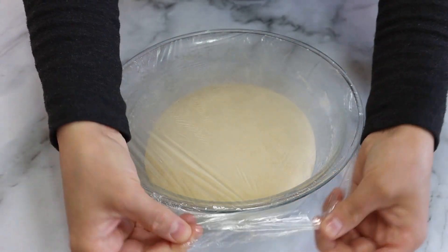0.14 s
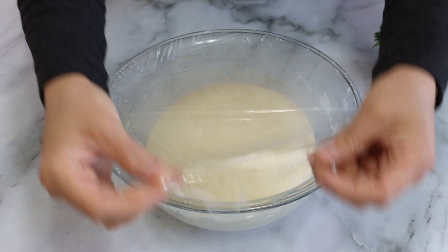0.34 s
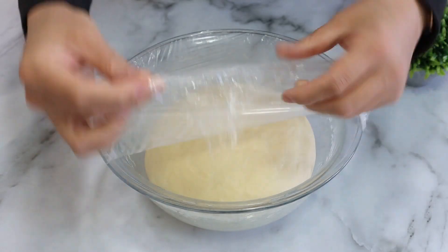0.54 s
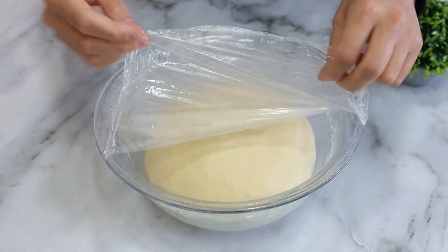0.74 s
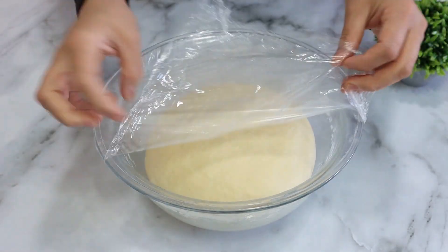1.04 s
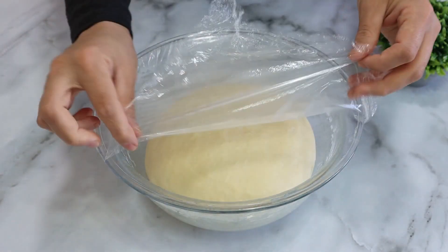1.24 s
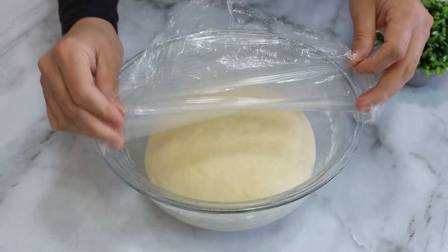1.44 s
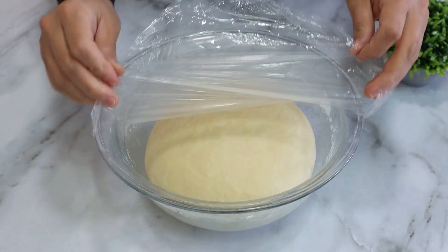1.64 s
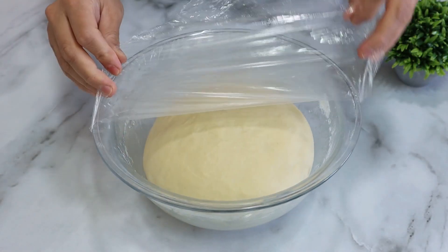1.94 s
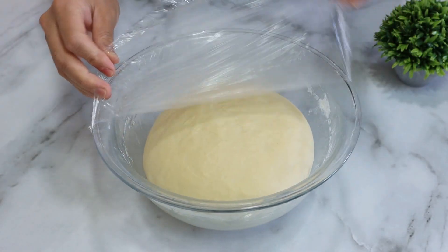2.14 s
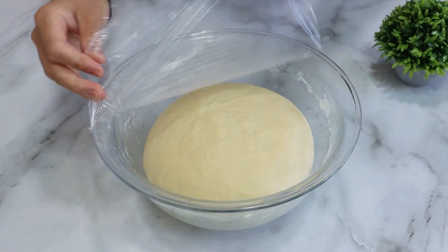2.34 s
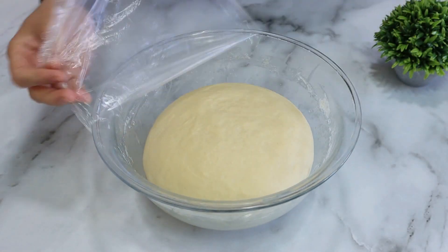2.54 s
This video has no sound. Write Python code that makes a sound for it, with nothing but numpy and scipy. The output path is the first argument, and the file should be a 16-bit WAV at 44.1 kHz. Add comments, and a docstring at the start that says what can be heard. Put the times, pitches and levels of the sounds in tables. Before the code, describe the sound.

Thin cling film is peeled off a glass bowl, heard close in a quiet kitchen. After a faint rub, dense crackle and sharp popping snaps build from 0.1 s, strongest at 0.3-0.5 s, with soft rustle and faint bowl ringing. It thins to near silence around 0.9-1.2 s. Brighter, looser crinkles and ticks come at 1.3-1.8 s, then another crackly pull at 2.2-2.5 s, fading to a last small tick near 2.7 s.

```python
"""Peeling cling film off a bowl

Hands peel cling film off a glass bowl on a kitchen counter, heard from close by.
The taut film unsticks in dense crackle and sharp snaps, rests, then crinkles as it is drawn back.
Each snap is a short low-pitched pop plus a bright tick of noise; crackle is shaped from random clicks.
Soft rubs, a hum, bumps, rustle and rumble lie below; the bowl rings faintly and the kitchen answers."""
import sys
import numpy as np
from scipy import signal
from scipy.fft import rfft, irfft
from scipy.io import wavfile
from scipy.ndimage import uniform_filter1d

SR = 44100
rng = np.random.default_rng(int(sys.argv[2]) if len(sys.argv) > 2 else 0)


def generate_wav(signal):
    """Clip the signal to [-1, 1] and save it as 16-bit WAV at the path in sys.argv[1]."""
    frames = np.transpose(np.atleast_2d(signal))
    scaled = np.clip(frames, -1, 1) * 32767
    pcm = np.round(scaled).astype(np.int16)
    wavfile.write(sys.argv[1], SR, pcm)


N = 119070
TIME = np.arange(N) / SR


def amp(db):
    """Turns decibels into a plain multiplier."""
    return 10 ** (np.asarray(db) / 20)


def unit(x):
    """Scales a sound to an average strength (rms) of 1."""
    return x / np.sqrt(np.mean(x ** 2) + 1e-20)


def read(points, hz):
    """Reads a table between its points, on a logarithmic pitch axis."""
    f, value = np.transpose(points)
    return np.interp(np.log(hz + 1), np.log(f + 1), value)


def level(table, axis):
    """Turns one dB column of a table into a multiplier that changes over time."""
    rows = np.array(table)
    return amp(np.interp(TIME, rows[:, 0], rows[:, axis]))


def add(mix, s, sound):
    """Mixes a sound in, starting at time s in seconds."""
    part = mix[max(0, round(s * SR)):][:len(sound)]
    part += sound[:len(part)]


def colour(x, points):
    """Filters a sound to a spectrum shape, without pre-echo; the filter has unit energy."""
    log_gain = np.log(amp(read(points, abs(np.fft.fftfreq(4096, 1 / SR)))))
    # the Hilbert transform supplies the phase that puts the energy as early as possible
    spectrum = np.exp(np.conj(signal.hilbert(log_gain)))
    taps = np.fft.ifft(spectrum).real[:2048]
    return signal.fftconvolve(x, taps / np.linalg.norm(taps))[:N]


# Tone of the steady background noise: (pitch [Hz], relative level [dB])
FLOOR_COLOUR = [(25, -5), (60, 7.5), (200, -5), (500, -11.5), (1600, -2.5), (4000, -19.5), (8000, -13),
                (13000, -15), (16000, -27.5)]
FLOOR_DB = -84.5


def background():
    """Steady, very quiet noise: random samples filtered to one fixed tone."""
    return amp(FLOOR_DB) * colour(rng.standard_normal(N), FLOOR_COLOUR)


# Time the room's tail takes to fall by 60 dB: (pitch [Hz], decay time [s])
ROOM_T60 = [(100, 0.44), (500, 0.18), (1500, 0.46), (4000, 0.63), (9000, 0.6), (15000, 0.4)]
ROOM_DB, NEAR_DB = -14.5, -6  # strength of the tail and of the quick reflections
NEAR_S = 0.008  # the quick reflections shrink to 37 % in this time


def kitchen(x):
    """Quick reflections from bowl and counter, then a room tail that decays by pitch."""
    t = np.arange(SR) / SR
    near, far = rng.standard_normal((2, SR)) * (t > .002)
    near = near * np.exp(-t / NEAR_S)
    hz, when, bands = signal.stft(far, SR, nperseg=256)
    decay = np.exp(-np.log(1000) * when / read(ROOM_T60, hz)[:, None])
    tail = signal.istft(bands * decay, SR, nperseg=256)[1][:SR]
    echo = amp(NEAR_DB) * near / np.linalg.norm(near) + amp(ROOM_DB) * tail / np.linalg.norm(tail)
    return signal.fftconvolve(x, echo)[:N]


# Loudness of the moving arms: (time [s], level [dB])
RUMBLE = [(0, -83.5), (.14, -84), (.2, -61), (.42, -64.5), (.55, -77.5), (.7, -94), (1.12, -97),
          (1.28, -66.5), (1.55, -75.5), (1.65, -68), (2.52, -64.5), (2.7, -71.5)]
# Tone of the moving arms: (pitch [Hz], relative level [dB])
RUMBLE_COLOUR = [(20, -27.5), (52, -0.5), (95, -8), (135, -1), (260, -10), (600, -38)]


def rumble():
    """The arms rumble as they move: low filtered noise that swells and fades."""
    return level(RUMBLE, axis=1) * colour(rng.standard_normal(N), RUMBLE_COLOUR)


# Loudness of the flapping sheet and the hands: (time [s], level before RUSTLE_DB is added [dB])
RUSTLE = [(0.0, -64.5), (0.11, -84), (0.17, -39.5), (0.25, -55.5), (0.29, -39), (0.5, -54), (0.59, -66),
          (1.11, -88.5), (1.19, -83), (1.49, -59), (1.56, -92), (1.64, -56), (1.91, -64.5), (1.93, -51),
          (2.17, -70), (2.4, -48), (2.59, -66.5), (2.7, -64.5)]
# Tone of that rustle: (pitch [Hz], relative level [dB])
RUSTLE_COLOUR = [(20, -32), (110, -20.5), (185, -11.5), (245, 1), (330, -0.5), (470, -2), (620, -4.5),
                 (1500, -44.5)]
RUSTLE_DB = -3.5


def rustle():
    """The whole sheet flaps softly, pushing air as dull filtered noise."""
    flap = colour(rng.standard_normal(N), RUSTLE_COLOUR)
    return amp(RUSTLE_DB) * level(RUSTLE, axis=1) * flap


# Soft bumps of the hands on the bowl: (time [s], pitch [Hz], level [dB])
BUMPS = [(0.324, 100, -50), (1.46, 84.6, -51.5), (1.886, 73.7, -56), (2.511, 55.3, -54.5)]
BUMP_S = 0.0059  # time for a bump to swell to its peak


def bumps():
    """Dull pushes of the hands against the bowl: low tones that swell and die at once."""
    out, t = np.zeros(N), np.arange(SR // 8) / SR
    swell = t / BUMP_S * np.exp(1 - t / BUMP_S)
    for s, hz, db in BUMPS:
        add(out, s, amp(db) * swell * np.sin(2 * np.pi * hz * t))
    return out


# Film rubbing on the glass, and the bowl's soft hum that the rubbing keeps up (the long 511 Hz row):
# (time [s], length [s], pitch [Hz], pitch spread [Hz], level [dB])
RUBS_AND_HUM = [(.0, 0.069, 229.5, 31, -65.5), (0.022, 0.14, 1162, 410, -52.5),
                (0.44, 0.13, 570, 130, -52.5), (0.589, 0.18, 584, 94, -64.5), (.72, .09, 1800, 300, -60.5),
                (.762, 0.02, 1276, 100, -50.5), (.845, 0.049, 1782, 400, -60),
                (.85, 0.056, 2416, 78, -67.5), (1.158, 0.1, 326, 45, -59.5), (1.215, .14, 358, 160, -58),
                (1.239, .09, 1927, 1000, -58.5), (1.245, 0.12, 512, 37, -58), (1.3, 1.5, 511, 37, -66),
                (1.36, .11, 890, 120, -56.5), (1.58, 0.12, 780, 74, -52.5), (1.817, 0.13, 2430, 5.6, -63),
                (2.007, .16, 1150, 190, -61.5), (2.298, 0.19, 590, 300, -49.5)]


def rubs_and_hum():
    """Rubbing film squeaks and groans, and keeps the bowl humming: noise in a band around one pitch."""
    out, f = np.zeros(N), np.fft.rfftfreq(N, 1 / SR)
    for s, length, hz, spread_hz, db in RUBS_AND_HUM:
        band = 1 / (1 + (1.07 * (f - hz) / spread_hz) ** 2) ** 2
        tone = irfft(rfft(rng.standard_normal(N)) * band, N)[:int(length * SR)]
        fade = np.sin(np.linspace(0, np.pi, len(tone)))
        add(out, s, amp(db) * unit(tone * fade))
    return out


def bowl(film, modes, db):
    """The bowl and the air in it ring along with the film, as a set of fading tones."""
    t = np.arange(SR) / SR
    ring = np.zeros(SR)
    for hz, mode_db, t60 in modes:
        ring += amp(mode_db) * np.exp(-np.log(1000) * t / t60) * np.sin(2 * np.pi * hz * t)
    return amp(db) * np.std(film) * unit(signal.fftconvolve(film, ring)[:N])


# The film comes free of the near rim and goes slack
SLACK_AT_S, SLACKEN_S = 0.87, 0.44  # middle and length of the change


def slackness():
    """0 while the film is taut over the bowl, 1 once it hangs loose."""
    return np.clip((TIME - SLACK_AT_S) / SLACKEN_S + .5, 0, 1)


CLUMP_DB, CLUMPS_PER_S = 3.5, 130  # size of the random steps, and how many a second


def clumps():
    """The film lets go in fits and starts: quick uneven swells in loudness."""
    knots = rng.standard_normal(2000)
    swell = np.interp(TIME * CLUMPS_PER_S, np.arange(len(knots)), knots)
    return amp(CLUMP_DB * np.clip(swell, -2, 1))


GRAINS_PER_S, GRAIN_SPREAD_DB = 800, 4.5  # average count, and average extra level before the limit
GRAIN_LIMIT = 2.6  # in spreads: the largest grains stay under the snaps
CREASE_PITCHES = np.geomspace(600, 15000, 16)  # Hz
CREASE_Q = 7.4  # sharpness of each crease's ring
CREASE_SHARE, HISS_SHARE = 0.37, 0.03


def grains():
    """Tiny unstickings of random size; each rings briefly at a crease's pitch, over a little hiss."""
    size = amp(GRAIN_SPREAD_DB * np.minimum(rng.exponential(1, N), GRAIN_LIMIT))
    happens = rng.random(N) < GRAINS_PER_S / SR
    clicks = size * rng.choice([-1., 1.], N) * happens
    crease = rng.integers(0, len(CREASE_PITCHES), N)
    rings = np.zeros(N)
    for k, hz in enumerate(CREASE_PITCHES):
        rings += signal.lfilter(*signal.iirpeak(hz, CREASE_Q, SR), clicks * (crease == k))
    drive = (1 - CREASE_SHARE) * unit(clicks) + CREASE_SHARE * unit(rings)
    drive = drive + HISS_SHARE * rng.standard_normal(N)
    # even out the loudness over 700 samples (16 ms)
    return drive / np.sqrt(uniform_filter1d(drive ** 2, size=700) + 1e-9)


# Fine crackle of the pulled film, before BODY_DB and FIZZ_DB are added:
# (time [s], level of the sheet's body [dB], level of the fizz [dB])
CRACKLE = [(0, -55, -60), (0.045, -58.5, -48.5), (0.075, -43.5, -40), (0.115, -29.5, -31.5),
           (0.18, -22.5, -26.5), (0.225, -34.5, -36.5), (0.315, -35.5, -41), (0.345, -22.5, -21),
           (0.39, -34.5, -47.5), (0.425, -25, -27), (0.47, -30.5, -39.5), (0.53, -41, -68.5),
           (0.64, -57, -55), (0.72, -54, -58), (0.765, -53, -46), (0.81, -52, -66.5), (0.87, -72, -54.5),
           (0.92, -70.5, -71.5), (1.1, -83, -88), (1.225, -66.5, -60.5), (1.275, -44, -32.5),
           (1.335, -54, -54), (1.39, -42.5, -40), (1.445, -34.5, -46.5), (1.51, -51, -53.5),
           (1.58, -44, -37.5), (1.66, -39.5, -38), (1.75, -44, -48.5), (1.85, -50.5, -54), (1.92, -59, -60),
           (1.937, -37, -32.5), (1.995, -53.5, -57.5), (2.03, -48, -50.5), (2.08, -54.5, -50),
           (2.11, -53, -44), (2.19, -65.5, -50.5), (2.229, -48, -37.5), (2.238, -32.5, -36),
           (2.39, -35, -37), (2.48, -45, -49.5), (2.56, -61, -59.5), (2.64, -64.5, -64.5), (2.7, -35, -36)]
BODY_DB, FIZZ_DB = -9, -7
# Tones of body and fizz, taut and slack: (pitch [Hz], relative level [dB])
TAUT_BODY = [(150, -43), (400, -17.5), (700, -3), (1050, -4.5), (1800, -0.5), (2300, -15), (3300, -11),
             (4200, -25), (7000, -41.5)]
SLACK_BODY = [(150, -22.5), (480, -5.5), (640, -12), (1100, -1), (2100, -6.5), (2800, -8.5), (3600, -12),
              (4500, -33), (8000, -43.5)]
TAUT_FIZZ = [(2500, -63.5), (4500, -13.5), (5800, -0.5), (7500, 2.5), (10300, -8.5), (13300, 6),
             (14800, -3), (16000, -18.5)]
SLACK_FIZZ = [(2500, -46), (4800, -42.5), (6000, -27.5), (7400, -3), (10000, 2), (12800, 7), (14800, 1.5),
              (16000, -15)]
# A hard pull on loose film fills in a sizzle between body and fizz: (pitch [Hz], relative level [dB])
SIZZLE_COLOUR = [(1800, -23), (3200, 10), (4300, -1.5), (5600, -1.5), (7500, -11), (11000, -22.5)]
# Strength of the sizzle, relative to the middle of body and fizz: (time [s], level [dB])
SIZZLE_LEVEL = [(1.25, -23), (1.44, -3.5), (2.15, -8), (2.25, -0.5), (2.37, -8)]
FIZZ_HISS_SHARE = .7  # film sliding on film smooths the fizz


def crackle():
    """The grains sound the sheet's body and its fizz; both change tone as the film slackens."""
    drive, slack = grains() * clumps(), slackness()
    smooth = (drive + FIZZ_HISS_SHARE * rng.standard_normal(N)) / np.hypot(1, FIZZ_HISS_SHARE)
    body_level = level(CRACKLE, axis=1) * amp(BODY_DB)
    fizz_level = level(CRACKLE, axis=2) * amp(FIZZ_DB)
    body, fizz = drive * body_level, smooth * fizz_level
    sizzle = level(SIZZLE_LEVEL, axis=1) * smooth * np.sqrt(body_level * fizz_level)
    taut_sound = colour(body * (1 - slack), TAUT_BODY) + colour(fizz * (1 - slack), TAUT_FIZZ)
    slack_sound = colour(body * slack, SLACK_BODY) + colour(fizz * slack, SLACK_FIZZ)
    return taut_sound + slack_sound + colour(sizzle, SIZZLE_COLOUR)


# Single snaps of the film, before POP_DB and TICK_DB are added:
# (time [s], pop level [dB], tick level [dB], pop pitch [Hz], time to pop's peak [cycles], tick pitch [Hz])
SNAPS = [(0.0531, -42, -45, 1332, 1.1, 12370), (0.0841, -26, -28.5, 1056, 0.57, 8000.0),
         (0.1053, -24.5, -32, 1248, 0.59, 9300.0), (0.131, -21, -34.5, 1207, 0.74, 11620),
         (0.1359, -22.5, -28, 1179, 0.79, 11400), (0.1641, -19, -45, 1620, 0.64, 10570),
         (0.1648, -22.0, -25.5, 1049, 0.42, 11780), (0.1763, -23, -32, 1466, 1.49, 11150),
         (0.1832, -22.5, -12.5, 1680, 2.1, 13000), (0.2069, -20.5, -40.5, 892, 0.38, 10250),
         (0.2193, -23, -32, 1335, 0.46, 11430), (0.243, -22, -28, 1118, 1.3, 8900.0),
         (0.2471, -18, -43.5, 962, 0.34, 6590), (0.2853, -22.5, -36, 969, 0.8, 9450),
         (0.2991, -15.5, -22, 1520, 0.83, 9380), (0.3001, -23.5, -33, 1306, 1.01, 7960),
         (0.3307, -19.5, -29, 1007, 1.0, 10350), (0.3344, -23.5, -31.5, 1095, 0.38, 10040),
         (0.3379, -16.0, -40.5, 1545, 1.2, 10100.0), (0.341, -12, -24, 1259, 0.83, 9690),
         (0.3441, -18.5, -17.5, 1064, 1.28, 13020), (0.3761, -30.5, -29, 1455, 0.92, 12030),
         (0.3825, -18.5, -24.5, 1084, 1.78, 11300.0), (0.398, -16.5, -20.5, 1159, 0.9, 12150),
         (0.4122, -19.5, -16, 1282, 0.78, 11860), (0.4153, -14, -24.5, 1203, 0.84, 13650),
         (0.4255, -14.5, -21.5, 1580.0, 0.71, 12000), (0.4291, -32, -20.0, 1710.0, 0.61, 12170),
         (0.4305, -19.5, -26.5, 1610, 0.77, 12600.0), (0.4351, -14.0, -23, 1510, 0.89, 12140),
         (0.4479, -25, -23.5, 1573, 0.99, 10360), (0.4738, -10.0, -17.5, 1158, 0.58, 10320),
         (0.4768, -18.5, -27, 1231, 0.55, 10440), (0.4907, -19.5, -28, 1698, 0.26, 9460),
         (0.5198, -27, -31, 2210, 0.69, 6860), (0.5586, -40, -34, 1490, 0.36, 10090),
         (0.61, -50, -36, 1413, 0.36, 12120), (0.6661, -33.5, -36, 1463, 0.43, 8630),
         (0.7673, -37.5, -34.5, 1475, 0.67, 9350), (1.271, -35.5, -39.5, 1600.0, 0.79, 11080),
         (1.3859, -28.5, -23.5, 1560, 0.36, 9300), (1.3951, -34.5, -26.0, 1836, 1, 11260),
         (1.4131, -40.5, -42.5, 1905, 1.06, 11040), (1.4188, -26.0, -22, 2070, 1.37, 11230),
         (1.425, -33.5, -24.5, 2154, 1.2, 11700), (1.4297, -33.5, -18, 2323, 2.3, 11850),
         (1.4404, -28, -19, 2134, 1.5, 11510), (1.4519, -27.5, -20, 2114, 0.91, 11580),
         (1.5473, -37, -26.5, 1960, 0.49, 11120), (1.5594, -43.5, -25.5, 1620.0, 0.63, 12350),
         (1.5616, -38, -24.5, 2194, 1.7, 11960), (1.5818, -19, -18.0, 2130, 0.9, 10800),
         (1.5963, -22, -23.5, 1890, 0.89, 13080), (1.6361, -36.5, -25.5, 1590, 0.99, 11980),
         (1.643, -15, -21.5, 1593, 0.58, 10700), (1.644, -41, -22, 1460, 2.7, 12450),
         (1.6979, -25, -26, 1480, 0.66, 10620), (1.7394, -38.5, -22.5, 1926, 0.57, 12800),
         (1.7645, -25, -28.0, 1530, 0.46, 13240), (1.8252, -44, -29.5, 1660, 0.34, 12320),
         (1.9325, -32.5, -29, 1450, 0.75, 12350), (2.0261, -42.5, -36, 1562, 1.33, 11100),
         (2.0927, -48.5, -34.5, 1183, 0.39, 13100), (2.2349, -22.5, -27.5, 1668, 0.32, 10720),
         (2.2373, -26, -28.5, 1548, 0.63, 11680), (2.2695, -29, -31.5, 1930.0, 0.72, 11720),
         (2.2818, -36.5, -25, 1610, 0.71, 12500), (2.3206, -32, -29, 1443, 0.82, 11600),
         (2.3241, -31.5, -26.5, 1430.0, 0.25, 11470), (2.3503, -38, -26.5, 2170, 0.63, 11940),
         (2.3664, -29, -30, 1840, 1.3, 11160), (2.3706, -31, -35, 1530, 0.83, 11900),
         (2.3979, -26, -33.5, 1390, 0.61, 10500), (2.679, -39, -43.5, 1452, 0.32, 12800)]
# Tone of the ticks: (pitch [Hz], relative level [dB])
TICK_COLOUR = [(2000, -5), (4200, -8), (6000, 1.5), (9000, -1), (12500, -0.5), (14500, 4.5), (16000, -11)]
POP_DB, TICK_DB = -0.5, 0.5
POP_LOWEST_HZ = 340  # the light sheet radiates little bass
# a slower, lower tone follows each pop, as waves come back from the sheet's edge
POP_TAIL_DB, POP_TAIL_S, POP_TAIL_PITCH = -25, .005, .65  # level, time to peak, middle share of pop's pitch
TICK_S, TICK_WIDTH_HZ, TICK_BROAD = 0.00035, 2400, 0.16  # time to peak, bandwidth, share of plain noise
TICK_RING_DB, TICK_RING_S = 1, 0.0016  # ring against the tick, and its time to shrink to 37 %


def snaps():
    """A crease flips: a bright ringing tick, and a brief pop of the stretched sheet with a lower tail."""
    pops, ticks, t = np.zeros(N), np.zeros(N), np.arange(2048) / SR
    f = np.fft.rfftfreq(len(t), 1 / SR)
    tail_swell = t / POP_TAIL_S * np.exp(1 - t / POP_TAIL_S)
    tick_swell = t / TICK_S * np.exp(1 - t / TICK_S)
    for s, pop_db, tick_db, hz, cycles, tick_hz in SNAPS:
        grit = rng.standard_normal(len(t))
        u = t * hz / cycles
        pop = (u * np.exp(1 - u)) ** 2 * np.sin(2 * np.pi * (hz * t - cycles))
        tail_hz = hz * POP_TAIL_PITCH * (1 + 0.2036 * np.tanh(grit[0]))  # varies by chance
        tail = tail_swell * np.sin(2 * np.pi * tail_hz * t)
        add(pops, s, amp(pop_db + POP_DB) * (pop + amp(POP_TAIL_DB) * tail))
        # noise through a resonance at the tick's own pitch
        ring = irfft(rfft(grit) / (1 + 2j * (f - tick_hz) / TICK_WIDTH_HZ))
        tick = (ring + TICK_BROAD * grit) * tick_swell
        tick = tick + amp(TICK_RING_DB) * ring * np.exp(-t / TICK_RING_S)
        tick = tick / np.linalg.norm(tick) * np.sqrt(TICK_S * SR / 2)
        add(ticks, s, amp(tick_db + TICK_DB) * tick)
    bass_cut = signal.butter(2, POP_LOWEST_HZ, "high", fs=SR)
    return signal.lfilter(*bass_cut, pops) + colour(ticks, TICK_COLOUR)


# Tones of the bowl with the film stretched over it, and half open:
# (pitch [Hz], relative level [dB], time to fall by 60 dB [s])
COVERED = [(511, -3.5, 0.83), (629.5, 2.5, 0.38), (815, -6, 0.088), (996, -12.5, 0.46), (1060, 7.5, 0.06),
           (1310, -13.5, 0.45), (1620, -9.5, .35), (1920, -10, 0.55)]
OPEN = [(243.4, 8, 0.097), (511, -1, 0.38), (817, -1.5, 0.2), (1755, -15, 0.24)]
COVERED_DB, OPEN_DB = -17, -14  # ringing against the film that drives it
# Strength of the sideways sound against the centre, before filtering: (pitch [Hz], side level [dB])
TREBLE_WIDTH = [(100, -29), (300, -29), (1200, -43), (3000, -30), (6500, -29), (9000, -15), (15000, -12)]


def scene():
    """Film, bowl and room in the centre; room echo, mostly its treble, spreads to the sides."""
    film, slack = snaps() + crackle(), slackness()
    ringing = bowl(film * (1 - slack), COVERED, COVERED_DB) + bowl(film * slack, OPEN, OPEN_DB)
    direct = film + ringing + rustle() + rumble() + rubs_and_hum() + bumps()
    mid = direct + kitchen(direct) + background()
    spread = unit(kitchen(direct)) * np.std(mid)
    width = amp(read(TREBLE_WIDTH, np.fft.rfftfreq(N, 1 / SR)))
    side = irfft(rfft(spread) * width, N)
    return np.array([mid + side, mid - side])


EDGE_HZ = 16000


def record(dry):
    """Removes the sound above EDGE_HZ with a smooth low-pass filter."""
    low_pass = signal.firwin(255, EDGE_HZ, window=("kaiser", 9), fs=SR)
    return signal.oaconvolve(dry, low_pass[None], "same")


dry = scene()
out = record(dry)
generate_wav(out)
```